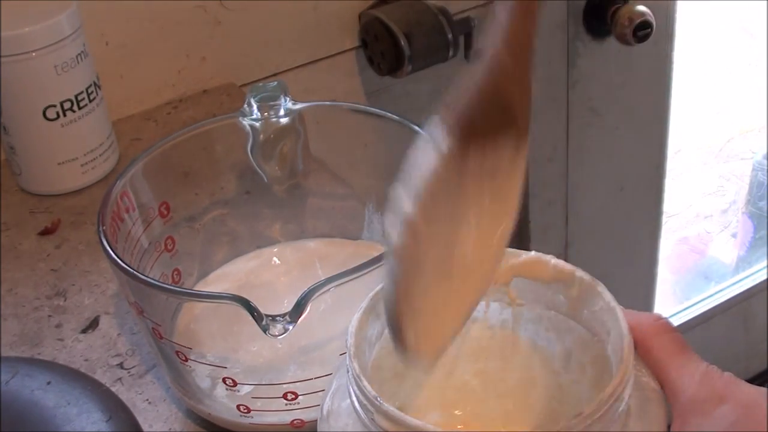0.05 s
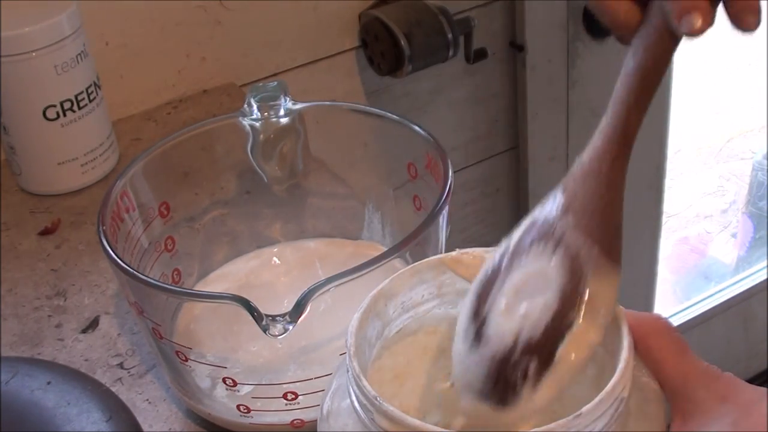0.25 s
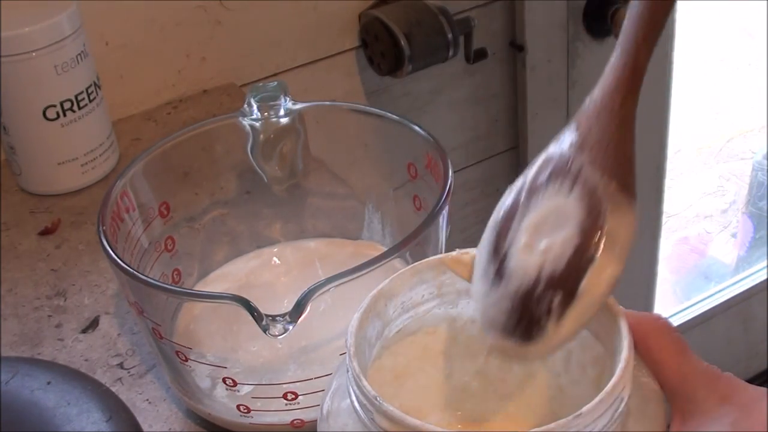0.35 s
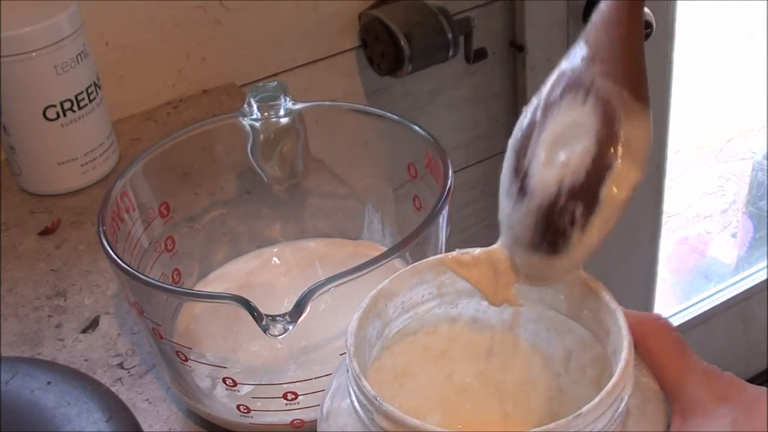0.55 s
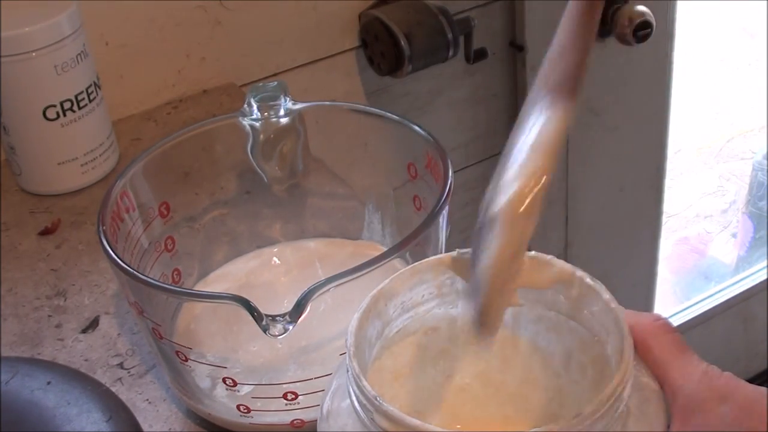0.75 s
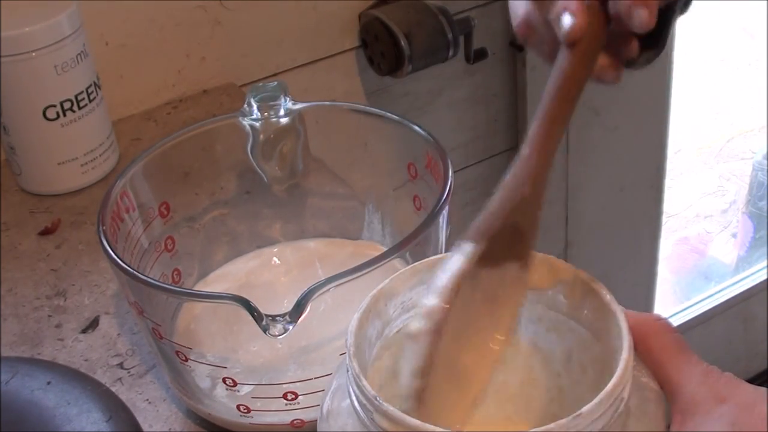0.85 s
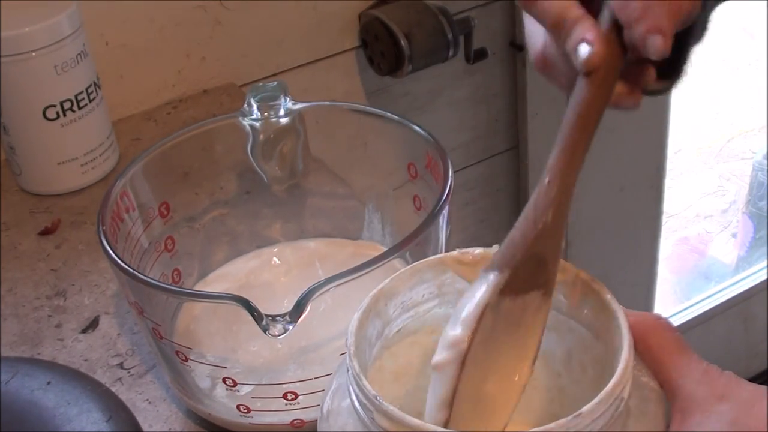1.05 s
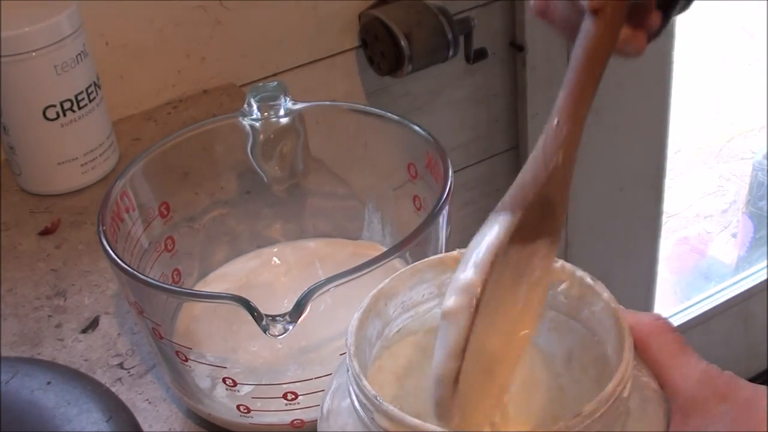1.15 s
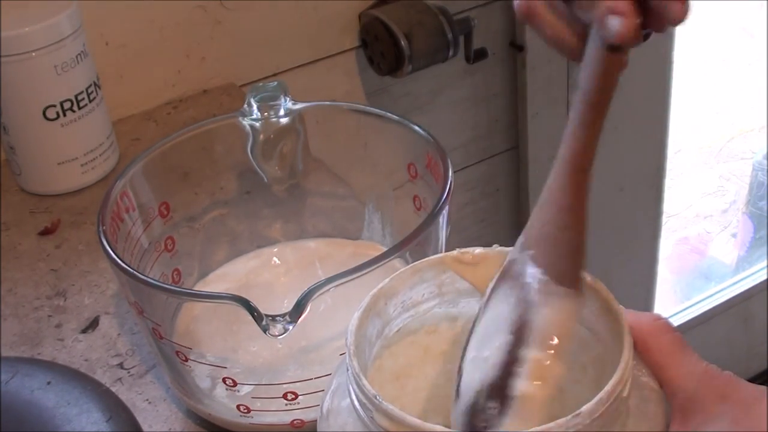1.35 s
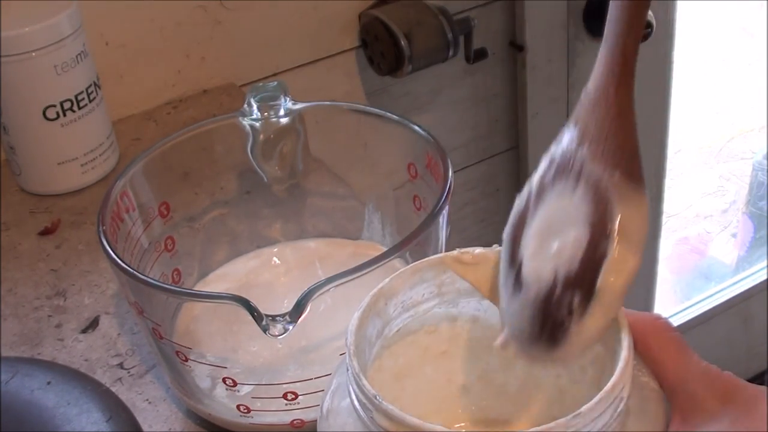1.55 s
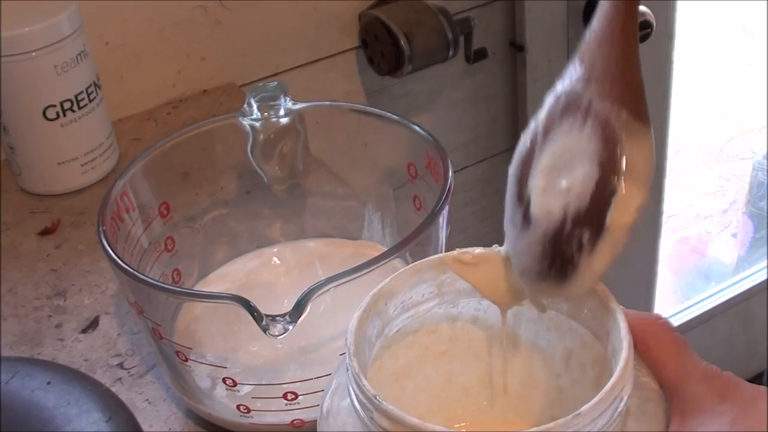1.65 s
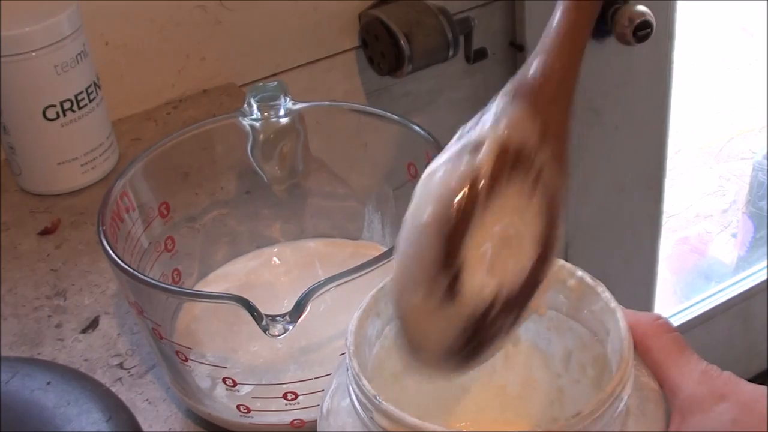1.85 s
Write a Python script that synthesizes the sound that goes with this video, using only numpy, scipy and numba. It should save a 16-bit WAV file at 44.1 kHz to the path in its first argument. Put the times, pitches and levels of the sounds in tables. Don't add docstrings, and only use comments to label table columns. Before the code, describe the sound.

A wooden spoon knocks on a half-full glass jar: dull, hollow thuds with small glassy rings. Double knocks at 0.2 and 0.3 seconds lead into a gritty, faintly squealing scrape until about 0.6. After a lull, knocks resume at 0.86, 1.07 and 1.22-1.27, with soft wet smears between. A bouncing cluster from 1.45 to 1.68 overlaps a second scrape, then quiet kitchen hum. Close microphones, short room tail.

```python
import sys
import numpy as np
from scipy import signal
from scipy.fft import rfft, irfft
from scipy.io import wavfile
from scipy.ndimage import uniform_filter1d
from numba import njit

SR = 44100
rng = np.random.default_rng(int(sys.argv[2]) if len(sys.argv) > 2 else 0)


def decibels_to_gain(level_db):
    exponent = np.asarray(level_db, float) / 20
    return 10 ** exponent


def log_audio(samples):
    frames = np.atleast_2d(samples).T
    limited = np.clip(frames, -1, 1)
    pcm = np.round(limited * 32767).astype(np.int16)
    wavfile.write(sys.argv[1], SR, pcm)


N = 83790


def on_log(table, hz):
    f, v = np.array(table, float).T
    return np.interp(np.log(np.maximum(hz, 1)), np.log(f), v)


def unit(x):
    return x / np.sqrt(np.mean(x ** 2))


def coloured(table):
    white = rfft(rng.standard_normal(N))
    return unit(irfft(white * decibels_to_gain(on_log(table, np.fft.rfftfreq(N, 1 / SR))), N))


def band(x, lo_hz, hi_hz):
    return signal.sosfilt(signal.butter(2, [lo_hz, hi_hz], "band", fs=SR, output="sos"), x)


def ring(x, hz, t60):
    pole = np.exp((2j * np.pi * hz - np.log(1000) / t60) / SR)
    return signal.lfilter([1], [1, -pole], x).imag


def walk(rate_hz):
    k = int(SR / rate_hz)
    return unit(uniform_filter1d(uniform_filter1d(rng.standard_normal(N), k), k))


@njit
def follow(x, attack, release):
    e, y = 0., np.empty(len(x))
    for i in range(len(x)):
        e += (x[i] - e) * (attack if x[i] > e else release)
        y[i] = e
    return y


# f/Hz, level/dB per Hz
AIR_SPECTRUM = [(30, -15), (100, 0.5), (250, 0.5), (600, -7), (4000, -17.5), (6500, -12.5), (9000, -22),
                (16000, -23.5)]
# f/Hz, level/dB
HUM = [(120, -59.5), (242, -56), (445, -59.5)]


def kitchen():
    floor_db, side_db = -51, -6.5
    t = np.arange(N) / SR
    hum = sum(decibels_to_gain(db + 2.5 * walk(12)) * np.sin(2 * np.pi * hz * t) for hz, db in HUM)
    mid = decibels_to_gain(floor_db + walk(14) / 2) * coloured(AIR_SPECTRUM) + hum
    side = decibels_to_gain(floor_db + side_db) * band(coloured(AIR_SPECTRUM), 13, 5400)
    return mid, side


# t/s, length/s, level/dB
SMEARS = [
    (0.055, 0.19, -58.5),
    (0.688, 0.036, -59),
    (0.755, 0.037, -58),
    (0.899, 0.04, -43),
    (1.12, 0.11, -49),
    (1.397, 0.069, -48.5),
    (1.746, 0.02, -50.5),
    (1.831, 0.028, -56.5),
]
# f/Hz, level/dB per Hz
WET_SPECTRUM = [(700, -54), (1500, -2.5), (3000, -6), (4200, -6), (5000, -2.5), (7500, 0.5), (9500, -5.5),
                (14000, -25)]


def wet_hiss(press):
    scrape_db = 2.5
    t = np.arange(N) / SR
    smear = sum(decibels_to_gain(db) * np.exp(-(1.04 * (t - s) / length) ** 2) for s, length, db in SMEARS)
    return (decibels_to_gain(scrape_db) * press + smear) * decibels_to_gain(0.95 * walk(60)) * coloured(WET_SPECTRUM)


# t/s, strength level/dB, thud f/Hz, lasting ring level/dB, glass level/dB
KNOCKS = [(.205, -12, 360, -6, -22), (0.212, -13, 918, -12, -48), (.262, -36, 327, -6, -42),
          (.299, -9.5, 385, -4.5, -27), (.313, -19.5, 394, -4, -38), (.39, -23.5, 470, 1.5, -45),
          (.508, -30, 280, -8.5, -45), (.534, -30.5, 263, -8.5, -42), (.859, -15, 821, -1, -18),
          (.869, -20, 320, -6, -45), (1.065, -12, 700, -9, -32), (1.072, -12.5, 402, 0, -63),
          (1.097, -21, 430, -4, -32), (1.221, -9.5, 333.6, -17, -40), (1.223, -13.5, 772, -18, -53),
          (1.252, -11.5, 843, -2, -22.5), (1.27, -13.5, 329, -7.5, -51), (1.453, -11.5, 396, -9, -40),
          (1.463, -13, 443, -8.5, -41), (1.511, -19, 405, -4.5, -34), (1.548, -12, 418, -7, -35.5),
          (1.577, -21, 320, -14.5, -52), (1.594, -22, 602, -5.5, -31), (1.675, -31, 482, -7.5, -37)]


def thuds():
    thud_t60_s = .06
    rattle_db, rattle_t60_s, rattle_oct = -3.5, .22, 1.005
    out, t = np.zeros(N + SR), np.arange(SR // 2) / SR
    thud_decay = decibels_to_gain(-60 * t / thud_t60_s)
    for s, db, hz, ring_db, _ in KNOCKS:
        thud = np.sin(2 * np.pi * hz * t) * thud_decay
        noise = band(rng.standard_normal(len(t)), hz / 2 ** rattle_oct, hz * 2 ** rattle_oct)
        rattle = unit(band(noise, 193, 1544)) * decibels_to_gain(rattle_db + ring_db - 60 * t / rattle_t60_s)
        rattle *= np.minimum(t * hz * 2, 1)
        out[int(s * SR):][:len(t)] += decibels_to_gain(db) * (thud + rattle)
    return out[:N]


def pushes(mode_db):
    contact_cycles = .3
    t, force = np.arange(N) / SR, np.zeros(N)
    for (s, _, hz, *_), db in zip(KNOCKS, mode_db):
        i = int(s * SR)
        through = np.clip((t[i:i + 256] - s) * hz / contact_cycles, 0, 1)
        force[i:i + 256] += decibels_to_gain(db) * np.sin(np.pi * through) ** 2 * 2 * hz / (contact_cycles * SR)
    return force


# f/Hz, level/dB, t60/s
BODY = [(186, -26, 0.35), (227, -20.5, 0.18), (262, -15, 0.066), (315, -3, .15), (405, 2.5, 0.1),
        (437.55, 2, 0.23), (596, -20, 0.4), (669, -14, 0.1), (810, -3, 0.082), (943, -2, 0.09),
        (1057.6, -4, 0.16), (1160, -6, 0.14), (1290, -20, 0.077), (1495, -21.5, 0.088)]


def body():
    off_pitch_db_per_oct, strike_spread_db = 4.5, 4
    boom_hz, boom_db, boom_rise_s, boom_t60_s = 104, -12.5, 0.011, 0.15
    rows = np.array(KNOCKS)
    blow_db, thud_hz = rows[:, 1] + rows[:, 3], rows[:, 2]
    place_db = strike_spread_db * rng.standard_normal((len(rows), len(BODY)))
    out = thuds()
    for k, (hz, db, t60) in enumerate(BODY):
        off_pitch_db = off_pitch_db_per_oct * np.abs(np.log2(hz / thud_hz))
        force = pushes(blow_db + place_db[:, k] - off_pitch_db)
        out += (-1) ** k * decibels_to_gain(db) * ring(force, hz, t60)
    out = signal.sosfilt(signal.butter(4, 178.2, "high", fs=SR, output="sos"), out)
    t = np.arange(SR // 2) / SR
    boom = np.sin(2 * np.pi * boom_hz * t) * decibels_to_gain(-60 * t / boom_t60_s)
    boom *= 1 - np.exp(-(t / boom_rise_s) ** 2)
    return out + decibels_to_gain(boom_db) * signal.fftconvolve(pushes(blow_db), boom)[:N]


# f/Hz, level/dB, t60/s
GLASS = [(1420, -33, .2), (2018, -1.5, .15), (2380, -12, 0.062), (2533, -13.5, 0.17), (3510, -30, 0.11),
         (5140, -30, .03), (6270, -12, 0.023), (7140, -27, .04), (7763, -4, 0.033), (8010, -20, .25),
         (9290, -24, .08), (8580, -10.5, 0.053), (10970, -15, 0.013), (12300, -41, .05)]


def glass():
    tick_db, tick_s, tick_hz = -13, .002, 6000
    taps = np.zeros(N)
    for s, *_, db in KNOCKS:
        taps[int(s * SR)] = decibels_to_gain(db)
    wall = sum((-1) ** k * decibels_to_gain(db) * ring(taps, hz, t60) for k, (hz, db, t60) in enumerate(GLASS))
    tick_shape = signal.lfilter([1], [1, -np.exp(-1 / (tick_s * SR))], taps)
    tick_noise = unit(band(rng.standard_normal(N), tick_hz / 0.86, tick_hz * 1.17))
    return band(wall, 400, 8700) + decibels_to_gain(tick_db) * tick_shape * tick_noise


# t/s, level/dB
FIRST_SCRAPE = [
    (.25, -61),
    (.27, -57.5),
    (.3, -51),
    (.354, -46),
    (.41, -42),
    (.47, -51),
    (.53, -52.5),
    (.55, -57.5),
    (.62, -69),
]
# t/s, level/dB
SECOND_SCRAPE = [
    (1.469, -66),
    (1.5, -58),
    (1.535, -47.5),
    (1.58, -49.5),
    (1.65, -48.5),
    (1.688, -52),
    (1.712, -54),
    (1.731, -75),
]


def grit():
    grain_db, flutter_db = 3.5, 2.5
    t, press = np.arange(N) / SR, np.zeros(N)
    for scrape in (FIRST_SCRAPE, SECOND_SCRAPE):
        times, levels = np.array(scrape).T
        press += decibels_to_gain(np.interp(t, times, levels, left=-200, right=-200))
    grains = unit(rng.standard_normal(N) * decibels_to_gain(grain_db * rng.exponential(size=N)))
    return press, grains * press * decibels_to_gain(flutter_db * walk(79))


SING_HZ = [255, 290, 400, 900, 1290, 2008, 3600, 4900, 6320, 7075, 7760, 8840, 10800, 11700]
# level/dB, t60/s
SINGS = [(7, 0.059), (8.5, 0.11), (7, 0.052), (-7, 0.038), (0.5, 0.02), (-16, .05), (-12.5, 0.1),
         (-7, 0.034), (-30, 0.053), (-17, 0.041), (2.5, 0.052), (-4, 0.062), (-1.5, 0.022), (-16, .04)]


def sing(friction):
    sing_db = -22
    modes = sum(decibels_to_gain(sing_db + db) * ring(friction, hz, t60) for hz, (db, t60) in zip(SING_HZ, SINGS))
    return band(modes, 145, 13800)


def squeal(press):
    squeal_hz, squeal_db, waver_db = 2010, 4, 4.5
    phase = np.cumsum(2 * np.pi * squeal_hz * (1 + 0.0031 * walk(39)) / SR)
    return decibels_to_gain(squeal_db + waver_db * walk(40)) * uniform_filter1d(press, size=800) * np.sin(phase)


def room(x):
    room_db, t60_s, damp_hz, side_db = -15.5, 0.26, 3240, -17
    t = np.arange(SR // 2) / SR
    tails = rng.standard_normal((2, len(t)))
    low = band(tails, 105, damp_hz)
    tails = low + (tails - low) * np.exp(-t / 0.021)
    tails *= decibels_to_gain(-60 * t / t60_s) * (t > .004)
    tails /= np.sqrt(np.sum(tails[0] ** 2))
    mid, side = decibels_to_gain(room_db) * signal.fftconvolve(x[None], tails, axes=1)[:, :N]
    return mid, decibels_to_gain(side_db) * side


# f/Hz, level/dB
BALANCE_DB = [(30, -5), (100, 2.1), (380, 2.4), (1300, 0.4), (2400, -1), (4400, -1.5), (8000, -0.5)]
# f/Hz, phase/rad
PORT_LEAD = [(30, 0.55), (250, 0.085), (700, -0.43), (2000, -0.61), (3000, -0.38), (6500, 0.57),
             (11000, -0.15)]


def scene():
    press, friction = grit()
    jar = body() + glass() + sing(friction) + squeal(press) + wet_hiss(press)
    wet, wet_side = room(jar)
    air, air_side = kitchen()
    hz = np.fft.rfftfreq(N, 1 / SR)
    half = decibels_to_gain(on_log(BALANCE_DB, hz) / 2) * np.exp(.5j * on_log(PORT_LEAD, hz))
    ports = irfft(rfft(jar + wet + air) * np.array([half, 1 / half]), N)
    return ports + (wet_side + air_side) * np.array([[1], [-1]])


def band_limit(x):
    return signal.sosfilt(signal.butter(12, 17010, fs=SR, output="sos"), x)


def record(dry):
    limit_db, limit_ratio, attack_s, release_s = -8, 2.5, 0.0022, 0.02
    duck_db, duck_release_s = -1.5, 0.28
    top_hz = 15900
    level = follow(np.abs(dry).max(axis=0), 1 / (attack_s * SR), 1 / (release_s * SR))
    limiter = np.maximum(level / decibels_to_gain(limit_db), 1) ** (1 / limit_ratio - 1)
    loudness = np.minimum(level / decibels_to_gain(limit_db - 19.5), 1)
    ducker = decibels_to_gain(duck_db * (follow(loudness, 0.0056, 1 / (duck_release_s * SR)) - 1))
    held = .7 * np.tanh(dry * limiter * ducker / .7)
    top_cut = signal.ellip(10, .2, 70, top_hz, fs=SR, output="sos")
    return band_limit(signal.sosfilt(top_cut, held))


dry = scene()
out = record(dry)
log_audio(out)
```